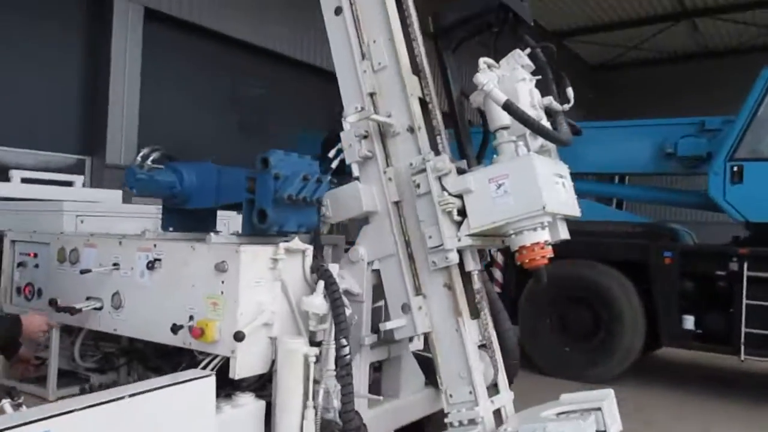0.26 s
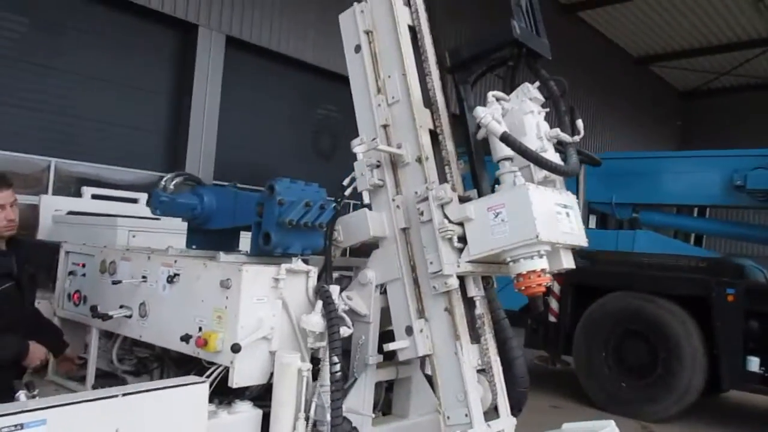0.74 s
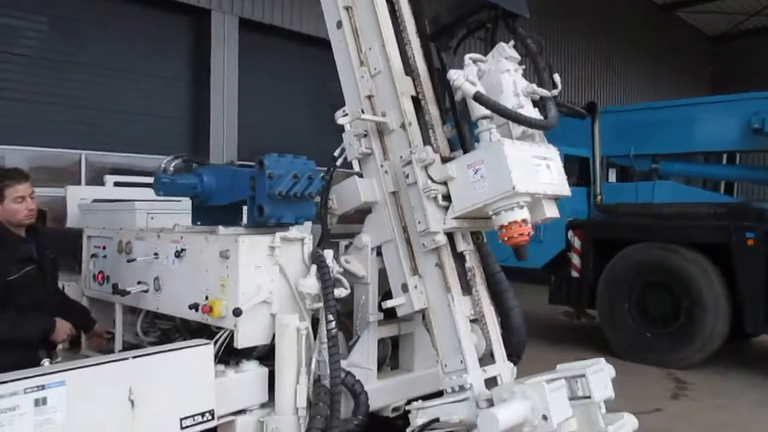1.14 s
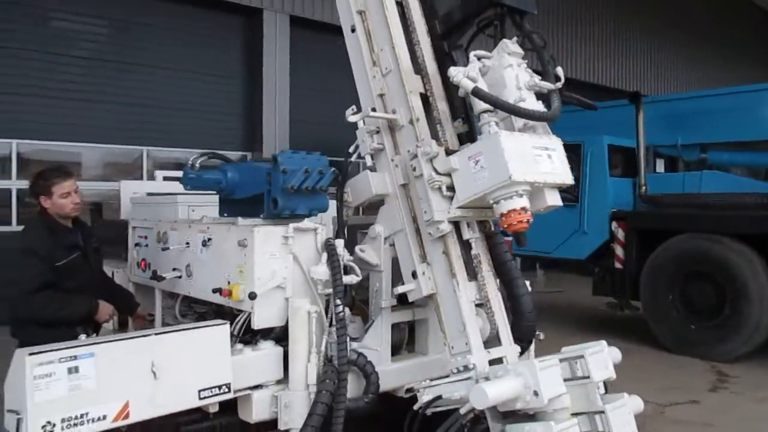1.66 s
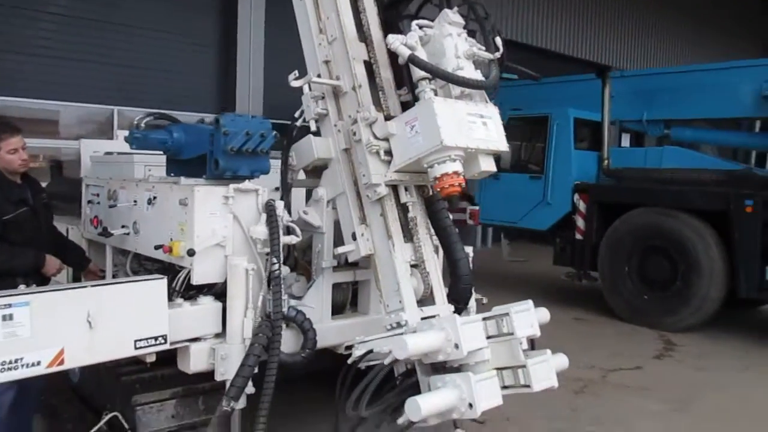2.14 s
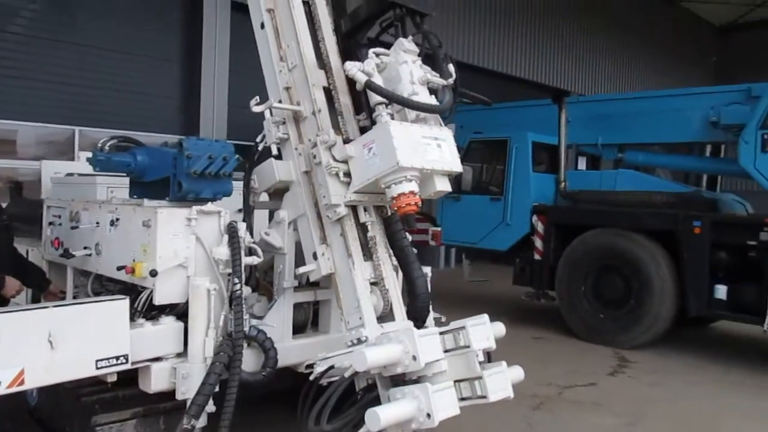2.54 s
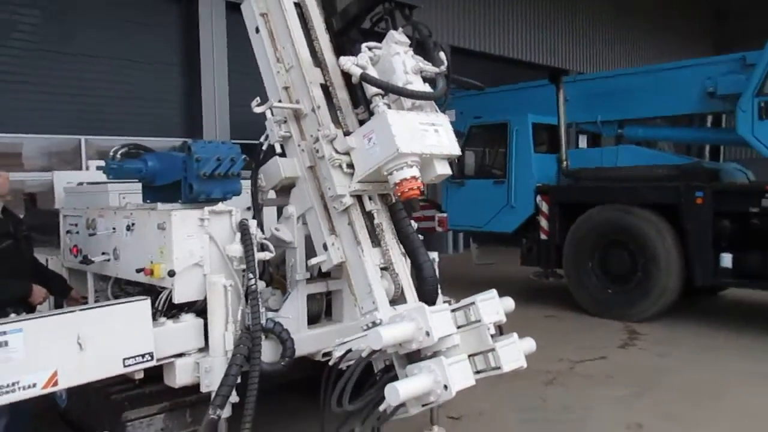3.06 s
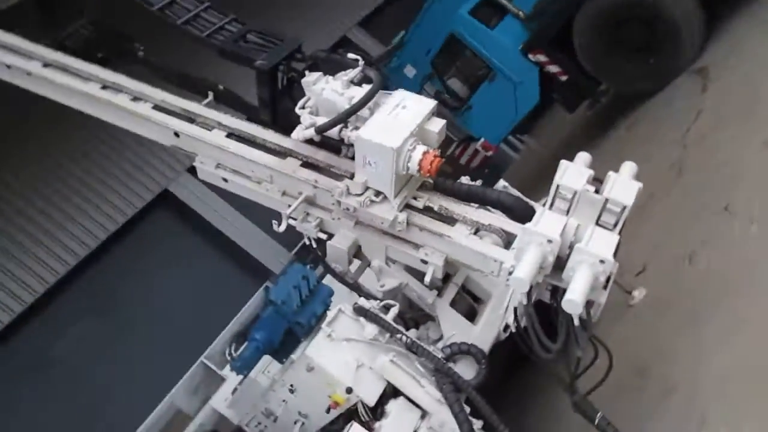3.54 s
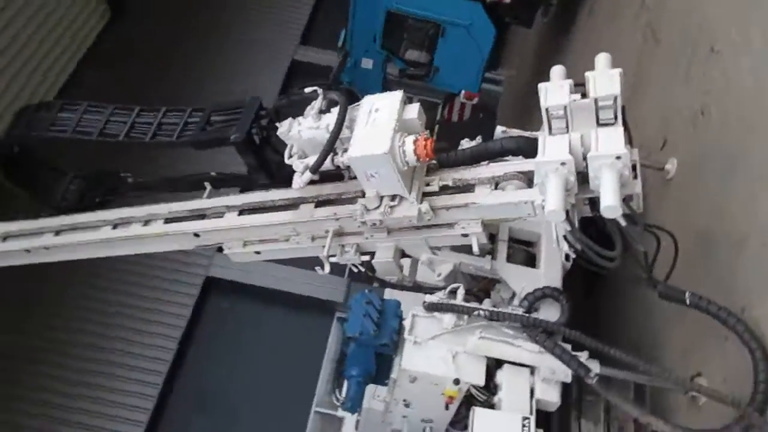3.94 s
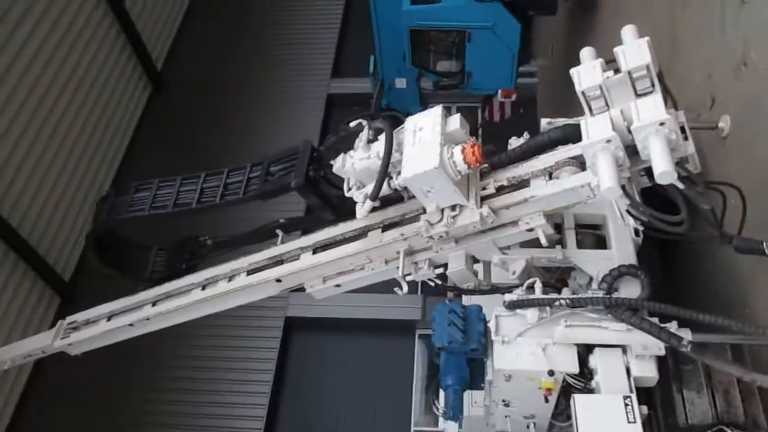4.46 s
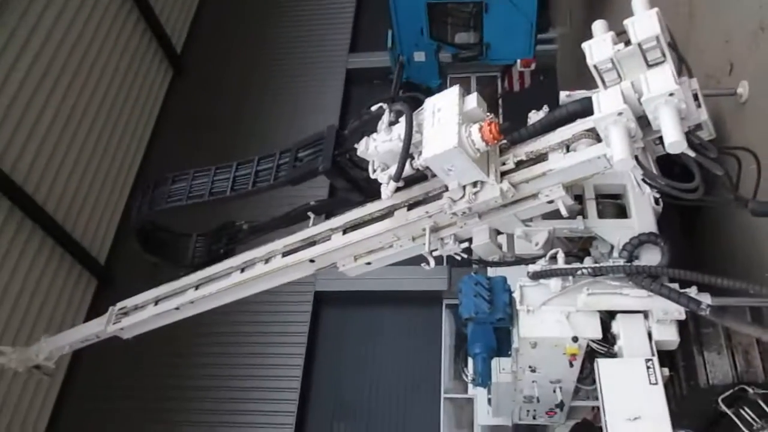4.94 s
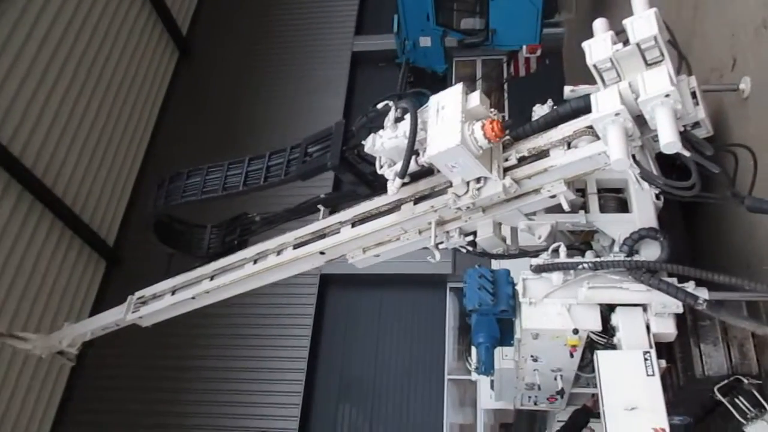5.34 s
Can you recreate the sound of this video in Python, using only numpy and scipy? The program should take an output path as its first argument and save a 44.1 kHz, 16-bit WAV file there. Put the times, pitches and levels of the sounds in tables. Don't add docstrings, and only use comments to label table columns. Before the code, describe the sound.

A diesel engine on a drill rig roars steadily with a hard pump hum in a steel shed, while fingers bump and click the camera case.

```python
import sys
import numpy as np
from scipy import signal
from scipy.fft import rfft, irfft, next_fast_len
from scipy.io import wavfile
from scipy.ndimage import uniform_filter1d, map_coordinates

SR = 44100
rng = np.random.default_rng(int(sys.argv[2]) if len(sys.argv) > 2 else 0)


def undo_db(level):
    steps = np.asarray(level, float) / 20
    return 10 ** steps


def store_pcm(level_fs):
    pcm = np.round(np.clip(level_fs, -1, 1) * 32767).astype(np.int16)
    wavfile.write(sys.argv[1], SR, np.atleast_2d(pcm).T)


N = 246954
T = np.arange(N) / SR

CYCLE_HZ = 12.3875
CREST_TO_CREST_S = 4.45
MAST_SHADE_DB, MAST_PASSED_S = 15, 0.99
HISS_DB, HISS_TURNED_DB = -17.5, -18.5
DUCK_S, RECOVER_S = 0.027, 0.28
HARD_CYCLES, CYCLES_PER_DB = 1, 0.1
CLICK_T60_S = 0.0056

# start in seconds, end in seconds.
TURN = (1.45, 3.4)
# time in seconds, how much earlier sound arrives in ms.
WALK = [
    (0, 8.6),
    (2.05, 11.65),
    (2.75, 10.05),
    (5.6, 8.1),
]
STANDING_ORDERS = (4, 8, 9, 17, 32, 42)
# first level in dB over the roar, last level in dB, swing in dB, first loud spot in seconds.
STANDING = [
    (11, 9.5, 0, 1.6),
    (3.5, 16.5, 0.86, 3.4),
    (2.5, -21, 3, 1.5),
    (-7.5, -5, 2, 1.3),
    (-16, -11, 4.5, 1.02),
    (-9, -14, -0.5, 3.8),
]
# multiple of the engine cycle, dB over the roar before the turn, dB after it.
ORDERS_DB = [(7, -11, -13), (10, -13, -4), (13, -17, -14), (16, -15, -12), (18, -11, -22), (20, -15, -8),
             (24, -15, -20), (28, -14, -11), (31, -21, -17), (40, -14, -21), (56, -13, -26), (60, -15, -16),
             (61, -17, -24), (64, -19, -18), (67, -19, -17), (70, -21, -21), (84, -23, -24)]
# frequency in Hz, level in dB per Hz.
ROAR = [(10, -40), (30, -34), (60, -12), (115, -17.5), (200, -17.5), (370, -22), (430, -25.5), (600, -23.5),
        (850, -23), (1440, -26), (2200, -28.5), (2600, -33), (7000, -48.5), (15400, -120)]
# frequency in Hz, level in dB per Hz.
HISS = [(2940, 4), (5000, -0.5), (8920, -5.5), (12900, -15.5), (15700, -20)]
WHINES = {(0, 2.6): [(1045, 35, -19), (1442, 18, -18), (1650, 50, -19), (2190, 80, -21), (3630, 90, -26),
          (9900, 250, -37)], (1.8, 3.6): [(1090, 50, -20), (1442, 12, -15.5), (9220, 90, -35),
          (12600, 150, -39)], (3.3, 5.6): [(1010, 35, -17), (1110, 50, -16.5), (1611, 10, -16.5),
          (2020, 70, -22), (3600, 200, -27), (11100, 250, -39)], (3.4, 4.4): [(1442, 16, -18),
          (8670, 200, -36), (13700, 250, -45)], (4.5, 5.6): [(1659, 6, -14), (8660, 160, -33),
          (12500, 200, -43)]}
# time in seconds, roar level in dB.
LEVEL = [
    (0, -25.5),
    (1.1, -24.5),
    (1.7, -23.5),
    (2.67, -24),
    (3.8, -26),
    (5.6, -27.6),
]
# time in seconds, depth in dB.
DUCKS = [
    (.61, 1.8),
    (2.675, 4.9),
    (2.89, 5.5),
    (4.47, 2.5),
]
# time in seconds, peak in dB, frequency in Hz.
PUSHES = [(.01, -21, 150), (.555, -14, 151), (.5625, -10, 199), (.5805, -14, 228), (.651, -8.5, 302),
          (.722, -10, 260), (1.37, -15, 200), (2.674, -21, 150), (2.6801, 0.5, 212), (2.706, -4, 100),
          (2.715, -16, 110), (2.738, -19, 472), (2.793, -10, 252), (2.852, -14, 250), (2.860, -8, 345),
          (2.872, -9, 256), (2.882, 2.5, 161), (2.895, -3, 297), (2.907, -11, 251), (4.457, -14.5, 220),
          (4.47, -17, 142), (4.946, -9, 190), (5.292, -9, 250), (5.43, -7.5, 201), (5.543, -16, 220),
          (5.561, -8, 111), (5.569, -18, 510), (5.579, -8, 332)]
# time in seconds, peak in dB, frequency in Hz.
PULLS = [(.427, -7, 133), (.6105, -4, 250), (.731, -16, 202), (1.245, -14, 130), (2.742, -12, 222),
         (2.816, -10, 128), (4.424, -20, 90), (4.953, -10, 111), (5.47, -15, 250), (5.4135, -5, 264)]
# time in seconds, peak in dB, frequency in Hz, length in cycles.
THUDS = [
    (.620, -12.5, 169, 4.7),
    (1.154, -8, 143, 4.9),
    (1.159, -20, 245, 11.6),
    (1.201, -15, 70, 3.9),
    (3.104, -17, 150, 2.3),
    (5.164, -16.5, 120, 7.8),
]
# time in seconds, peak in dB, ring in Hz,
# share of ring from 0 to 1, crack in Hz.
CLICKS = [
    (3.3495, -22, 4000, .4, 7500),
    (3.3528, -11, 3400, .62, 6500),
    (3.732, -27, 8500, .4, 12000),
    (4.2795, -26, 8500, .3, 9000),
    (4.5062, -19, 4200, .5, 9800),
    (4.9065, -19.5, 4300, .35, 9000),
    (5.59, -28, 4000, .1, 12000),
]
# start in seconds, end in seconds, level in dB.
RUSTLE = [
    (0, 0.784, -27),
    (1.1, 1.39, -32),
    (2.64, 2.924, -24.5),
    (3.085, 3.14, -26),
    (4.286, 4.5, -28.5),
    (4.9, 4.995, -27),
    (5.083, 5.6, -27.5),
]


def unit(x):
    return x / np.sqrt(np.mean(x ** 2) + 1e-20)


def curves(rows):
    s, *cols = np.transpose(rows)
    return [np.interp(T, s, c) for c in cols]


def wobble(rate):
    return map_coordinates(rng.standard_normal(int(N * rate / SR) + 4), [T * rate])


def filtered(x, response):
    m = next_fast_len(len(x) + 8192)
    return irfft(rfft(x, m) * response(np.fft.rfftfreq(m, 1 / SR)), m)[:len(x)]


def colour(points):
    f, db = np.transpose(points)
    return lambda hz: undo_db(np.interp(np.log(hz + 1), np.log(f), db))


def resonance(centre_hz, width_hz):
    return lambda f: 1j * f * width_hz / (centre_hz ** 2 - f * f + 1j * f * width_hz)


def patchy(depth_db):
    z = signal.stft(rng.standard_normal(N + 2048), nperseg=1024)[2]
    field = uniform_filter1d(rng.standard_normal(z.shape), size=3, axis=0)
    field = uniform_filter1d(field, size=70, axis=1)
    return unit(signal.istft(z * undo_db(depth_db * unit(field)), nperseg=1024)[1][:N])


def crank():
    lead_s = curves(WALK)[0] / 1000
    return 2 * np.pi * (CYCLE_HZ * (T + lead_s) + 1 / 4)


def mast_shade():
    return np.interp(T, [0, MAST_PASSED_S], [MAST_SHADE_DB, 0])


def standing():
    first, last, swing, crest = np.transpose(STANDING)[..., None]
    drift = first + (last - first) * T / T[-1]
    db = drift + swing * np.cos(2 * np.pi * (T - crest) / CREST_TO_CREST_S)
    db[-1] -= mast_shade()
    return db


def tones(angle):
    fire, double, ninth, *pump = standing()
    turned = np.interp(T, TURN, [0, 1])
    shade = mast_shade()
    out = undo_db(fire) * np.cos(4 * angle + .35 * turned)
    out += undo_db(double) * np.cos(8 * angle)
    out += undo_db(ninth) * np.cos(9 * angle - .5 + 1.3 * turned)
    out += undo_db(-5) * np.cos(12 * angle + 1.9)
    levels = [(order, db + 1) for order, db in zip(STANDING_ORDERS[3:], pump)]
    for order, before, after in ORDERS_DB:
        order = round(order)
        levels.append((order, before + (after - before) * turned - shade * (order == 40)))
    for order, db in levels:
        phase = 2 * np.pi * rng.random() + .012 * (order + 15) * wobble(2.5)
        out += undo_db(db + 1.1 * wobble(2.5)) * np.cos(order * angle + phase)
    return undo_db(2.5) * out


def clatter(angle):
    length = round(SR / CYCLE_HZ)
    place = angle / (2 * np.pi) % 1 * length
    patterns = rng.standard_normal((8, length))
    paths = np.array([wobble(1.2) for _ in patterns])
    paths /= np.linalg.norm(paths, axis=0)
    out = np.zeros(N)
    for gain, pattern in zip(paths, patterns):
        out += gain * map_coordinates(pattern, [place], order=1, mode="grid-wrap")
    return unit(out)


def roar(angle):
    beat = 1 + .06 * np.cos(4 * angle) + .08 * np.cos(angle)
    beat += .06 * np.cos(5 * angle) + .04 * np.cos(8 * angle)
    knock = filtered(clatter(angle),
                     lambda hz: np.interp(hz, [130, 560], [.3, 1], left=0) / (1 + (hz / 2400) ** 2))
    body = filtered(patchy(depth_db=1.5) * beat + undo_db(0.5) * knock, colour(ROAR))
    body -= 0.45 * np.interp(T, TURN, [0, 1]) * filtered(body, resonance(720, 150))
    body /= np.std(filtered(body, lambda hz: (hz > 800) & (hz < 8000)))
    flutter = (1 + .03 * np.cos(4 * angle)) * undo_db(0.31 * wobble(24.95))
    hiss = filtered(patchy(depth_db=2.5) * flutter, colour(HISS))
    hiss /= np.std(filtered(hiss, lambda hz: hz > 6000))
    hiss_db = np.interp(T, TURN, [HISS_DB, HISS_TURNED_DB]) - 1.17
    return undo_db(-2.58) * body + undo_db(hiss_db) * hiss


def whines():
    out = np.zeros(N)
    for (start, end), lines in WHINES.items():
        heard = np.interp(T, [start - .2, start + .1, end - .1, end + .2], [0, 1, 1, 0])
        for hz, width_hz, db in lines:
            whine = filtered(rng.standard_normal(N), lambda f: resonance(hz, width_hz)(f) ** 2)
            out += undo_db(db) * heard * unit(whine)
    return out


def gain_db():
    ducks = np.zeros(N)
    for s, db in DUCKS:
        ducks += db * np.clip((T - s) / DUCK_S, 0, 1) * np.exp(-np.maximum(T - s, 0) / RECOVER_S)
    return curves(LEVEL)[0] - ducks


def bumps():
    hits = []
    for rows, way in ((PUSHES, 1), (PULLS, -1)):
        hits += [(s, db, hz, HARD_CYCLES - CYCLES_PER_DB * db, way) for s, db, hz in rows]
    hits += [(*row, -1) for row in THUDS]
    out = np.zeros(N + SR)
    u = np.arange(-2000, 2000) / SR
    for s, db, hz, cycles, way in hits:
        swing = np.exp(-(3.14 * u * hz / cycles) ** 2) * np.cos(2 * np.pi * hz * u)
        out[round(s * SR):][:len(u)] += way * undo_db(db) * swing
    return out[2000:N + 2000]


def clicks():
    out = np.zeros(N + SR)
    t = np.arange(600) / SR
    for s, db, ring_hz, share, crack_hz in CLICKS:
        noise = rng.standard_normal(len(t))
        crack = unit(filtered(noise, lambda f: resonance(crack_hz, .7 * crack_hz)(f) ** 2)) / 2
        ring = np.sin(2 * np.pi * ring_hz * t)
        fade = undo_db(db - 60 * t / CLICK_T60_S) * (1 - np.exp(-t / .0006))
        out[round(s * SR):][:len(t)] += 2.5 * fade * (share * ring + (1 - share) * crack)
    return out[:N]


def rustle():
    level = np.zeros(N)
    for start, end, db in RUSTLE:
        level += undo_db(db) * np.interp(T, [start - .03, start, end, end + .04], [0, 1, 1, 0])
    lumps = rng.standard_normal(N) * undo_db(5 * wobble(30))
    return level * unit(filtered(lumps, lambda f: resonance(105, 160)(f) ** 2))


def scene():
    angle = crank()
    rig = tones(angle) + roar(angle) + whines()
    hand = bumps() + clicks() + rustle()
    return (undo_db(gain_db()) * rig + hand)[None]


def band_limit(x):
    return signal.sosfilt(signal.butter(12, 15820, fs=SR, output="sos"), x)


def record(dry):
    x = filtered(dry[0], lambda hz: hz ** 2 / (hz ** 2 + 12 ** 2) * (hz < 15800))[None]
    x = x / (1 + np.abs(x / .95) ** 8) ** (1 / 8)
    return band_limit(x)


dry = scene()
out = record(dry)
store_pcm(out)
```